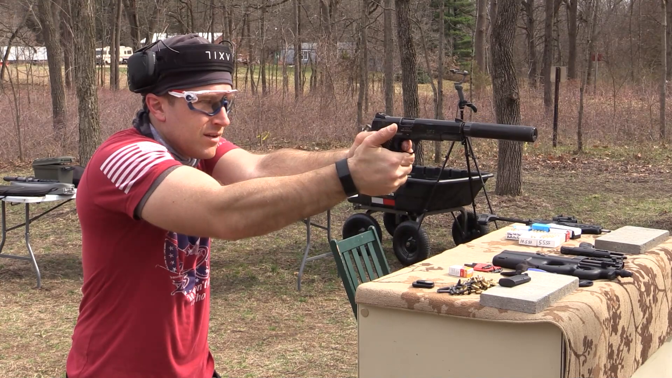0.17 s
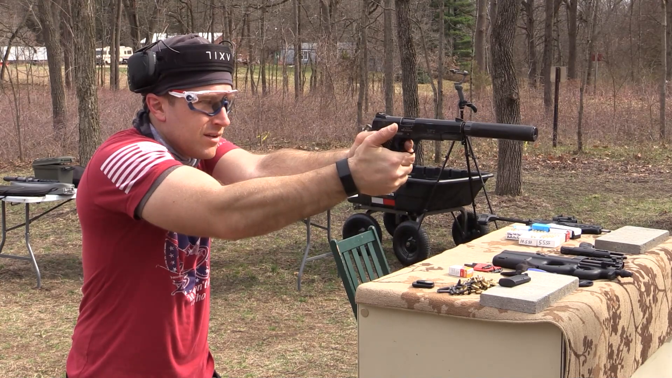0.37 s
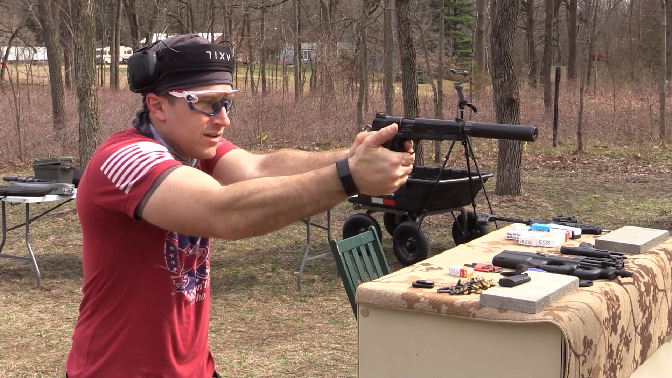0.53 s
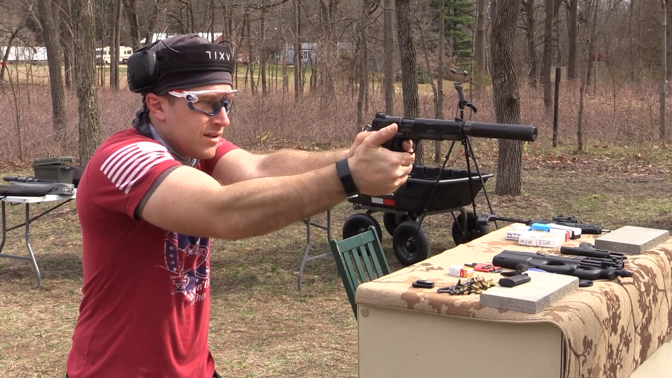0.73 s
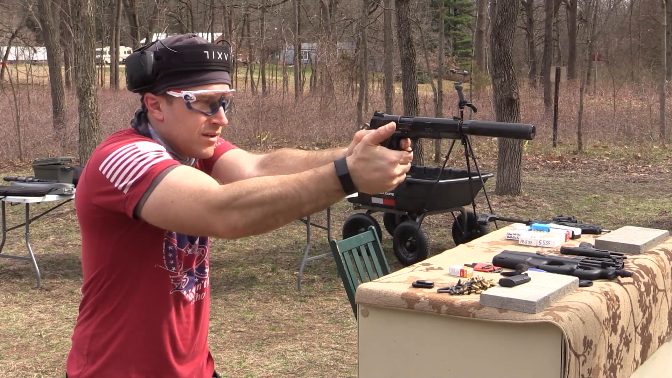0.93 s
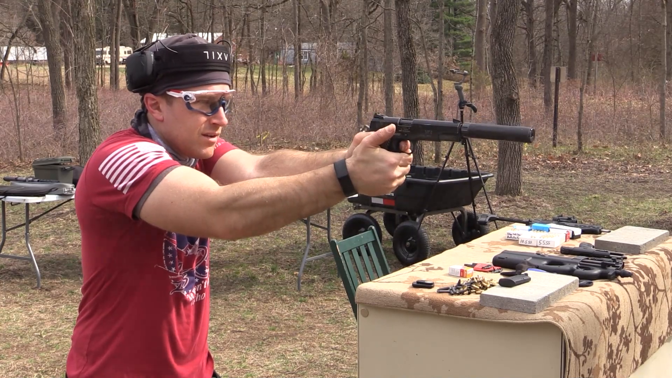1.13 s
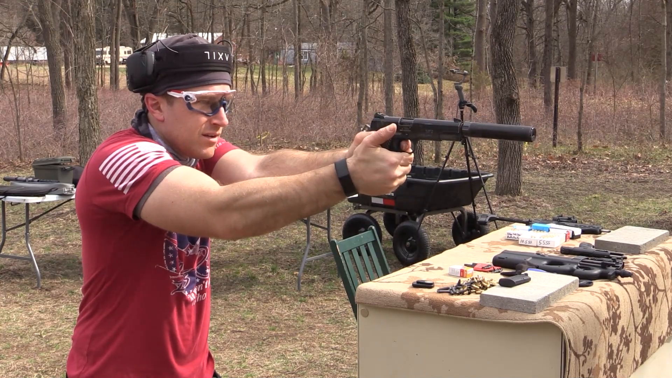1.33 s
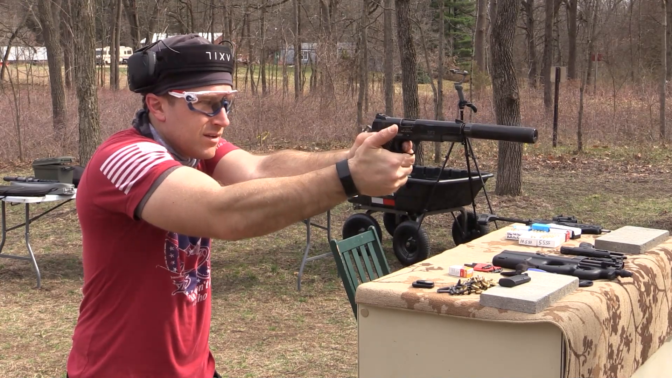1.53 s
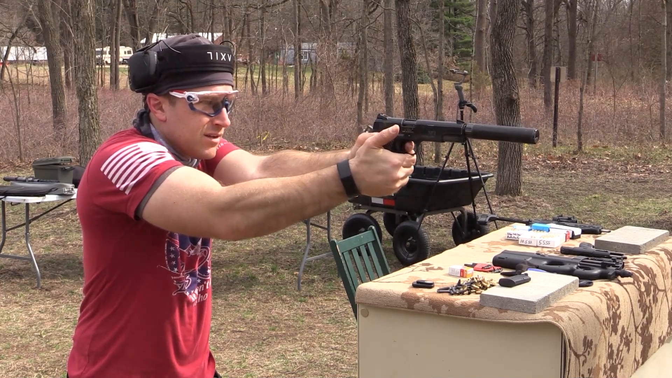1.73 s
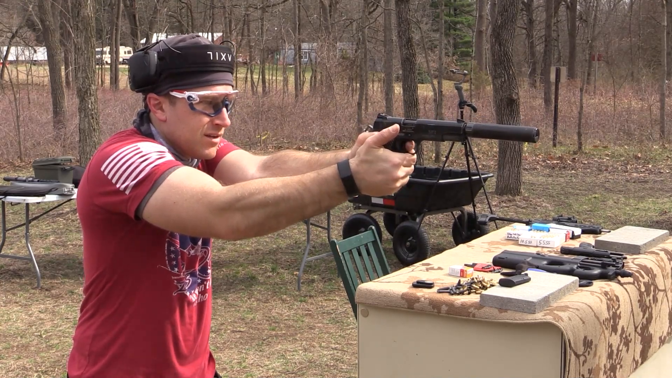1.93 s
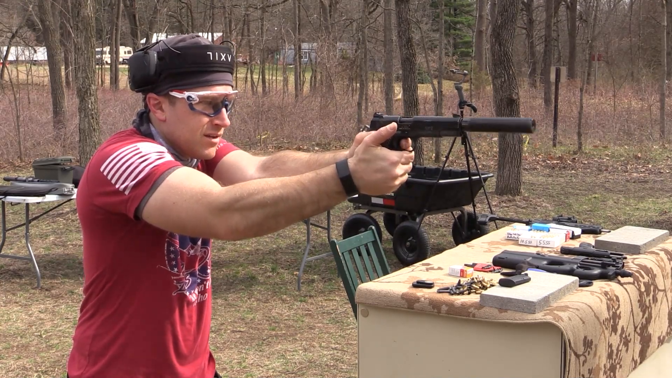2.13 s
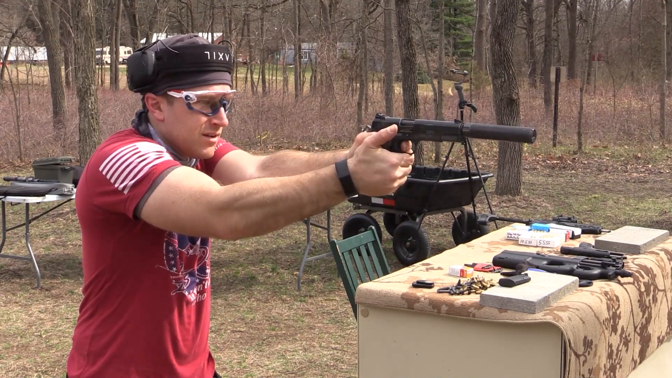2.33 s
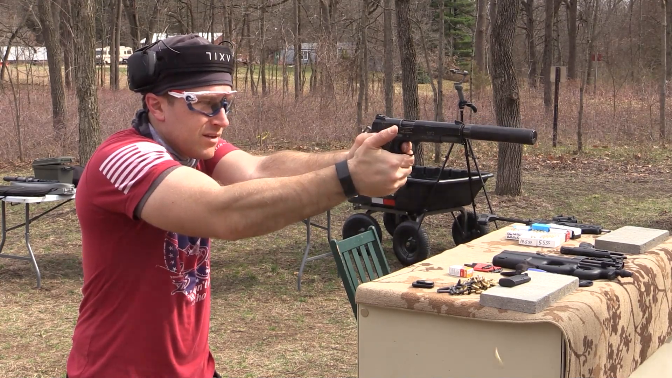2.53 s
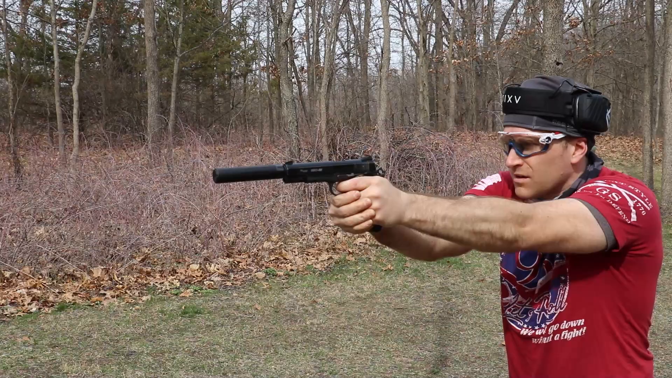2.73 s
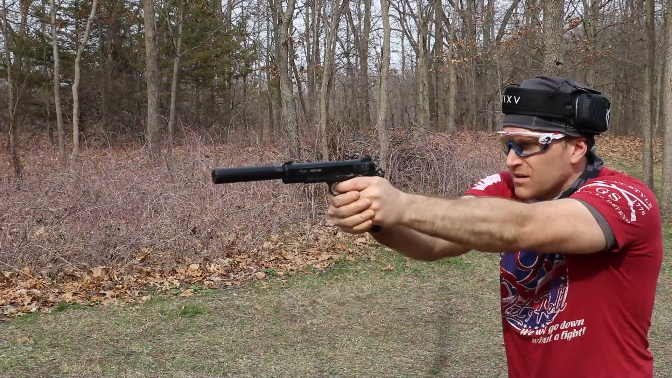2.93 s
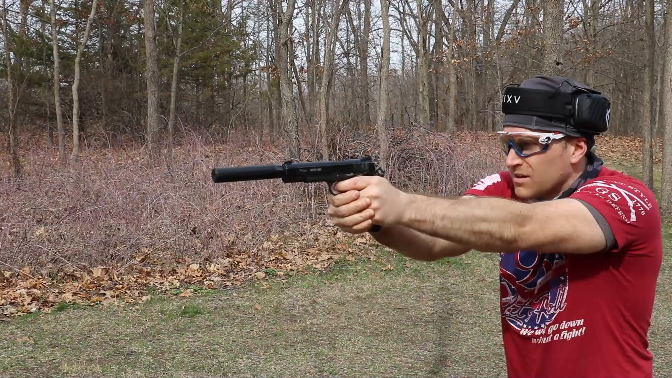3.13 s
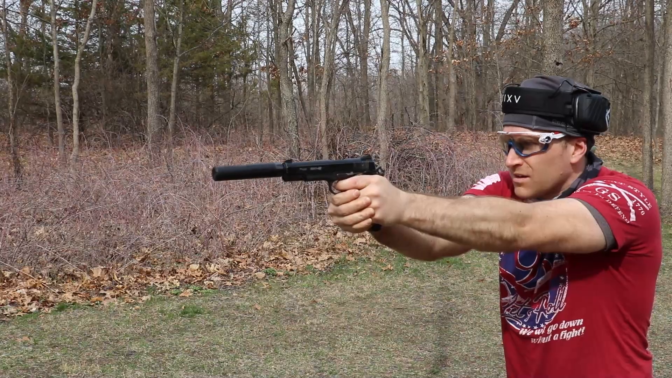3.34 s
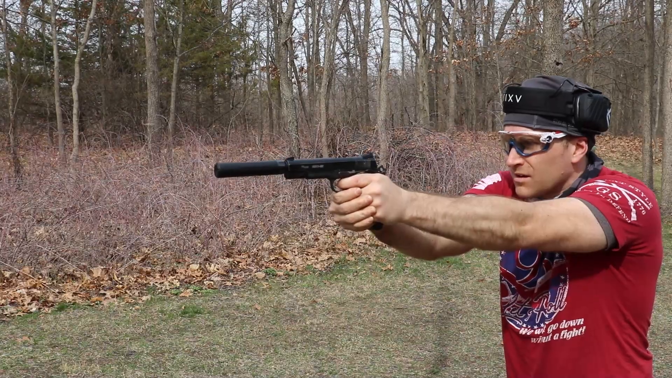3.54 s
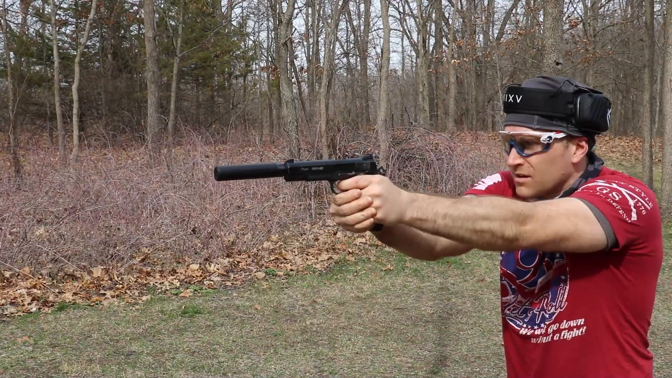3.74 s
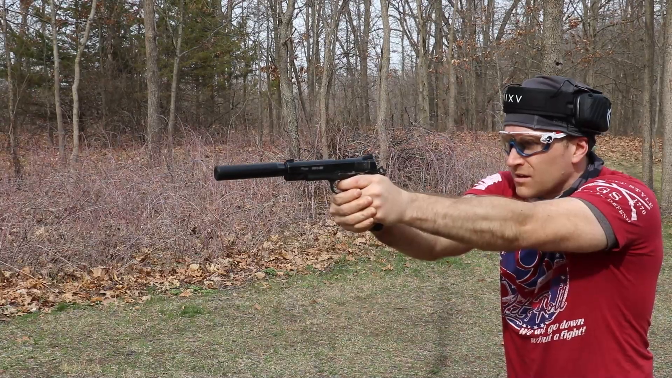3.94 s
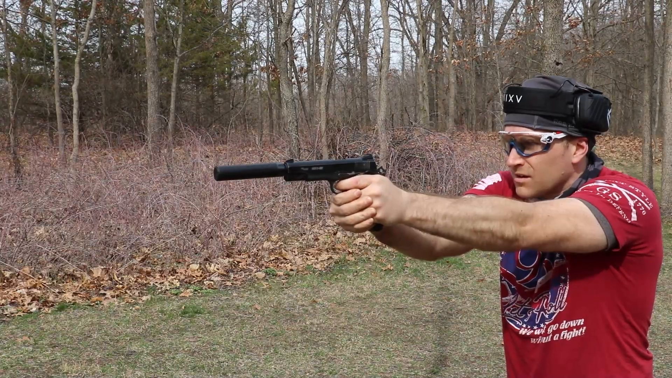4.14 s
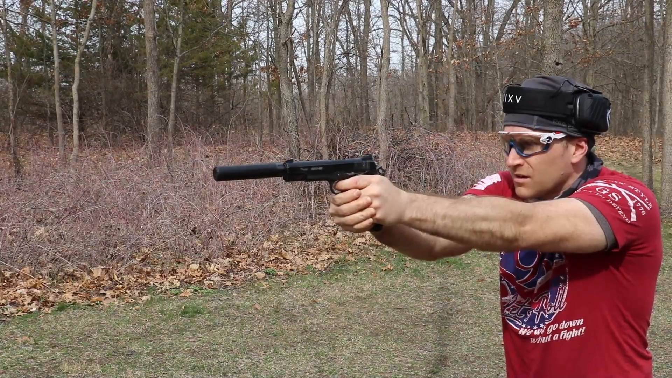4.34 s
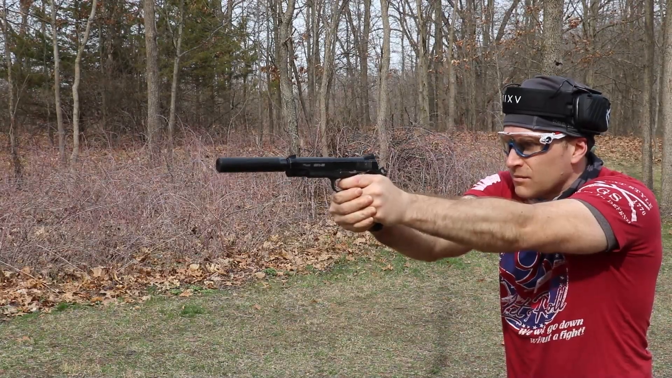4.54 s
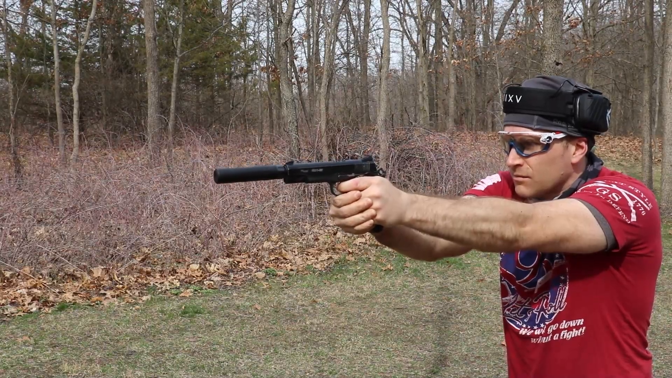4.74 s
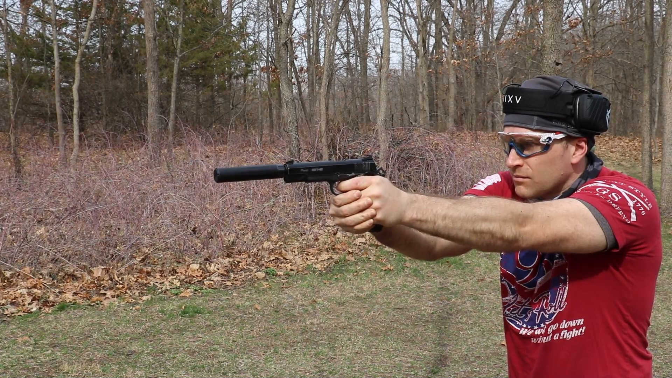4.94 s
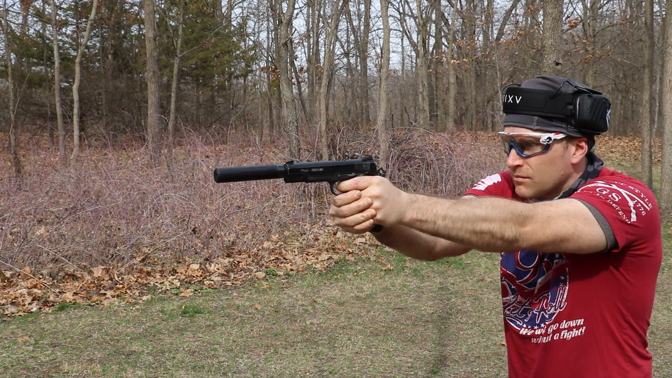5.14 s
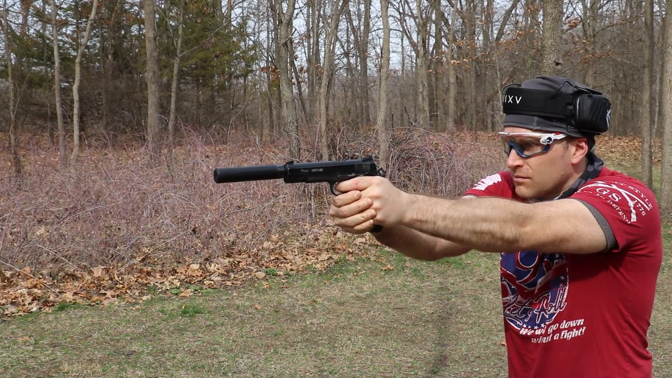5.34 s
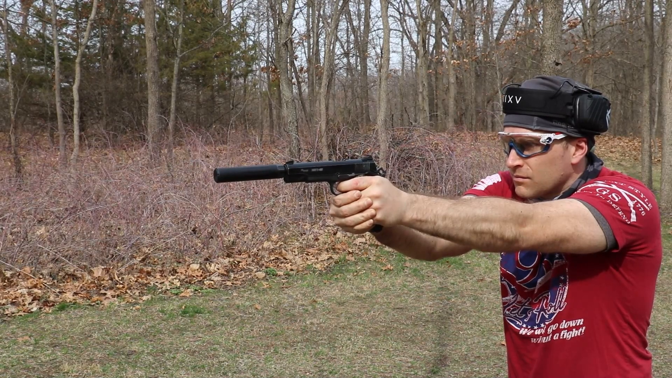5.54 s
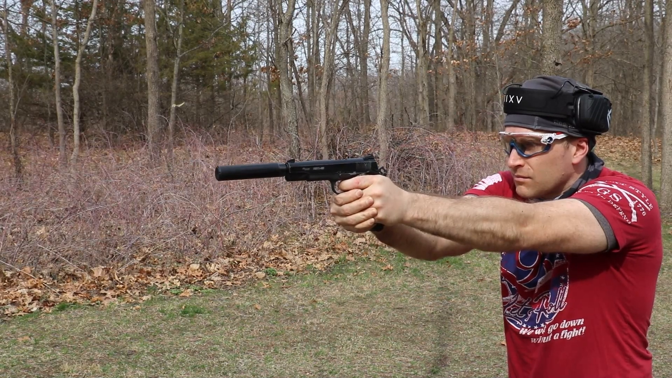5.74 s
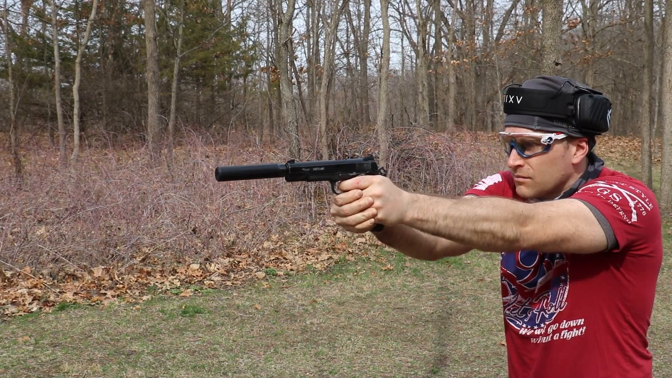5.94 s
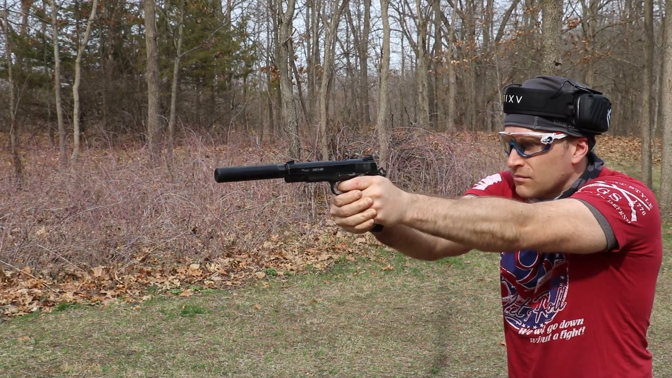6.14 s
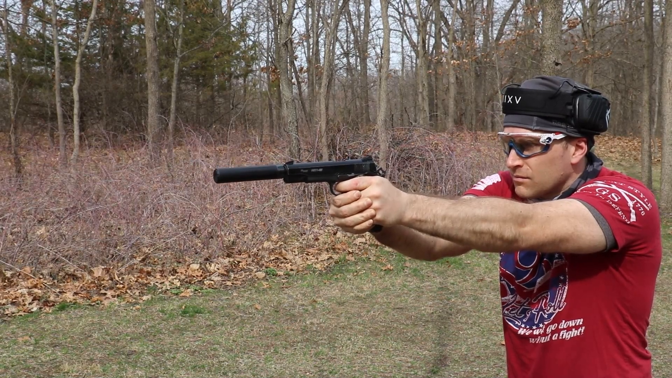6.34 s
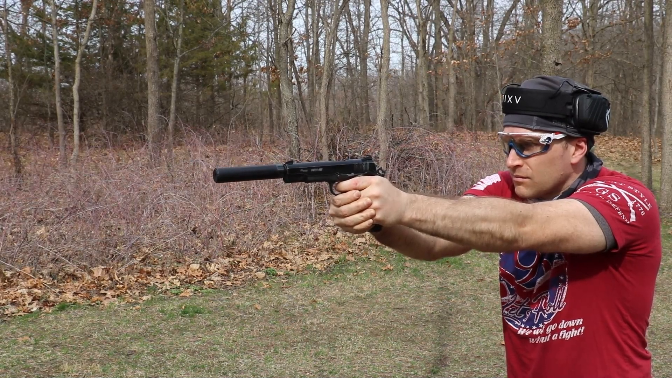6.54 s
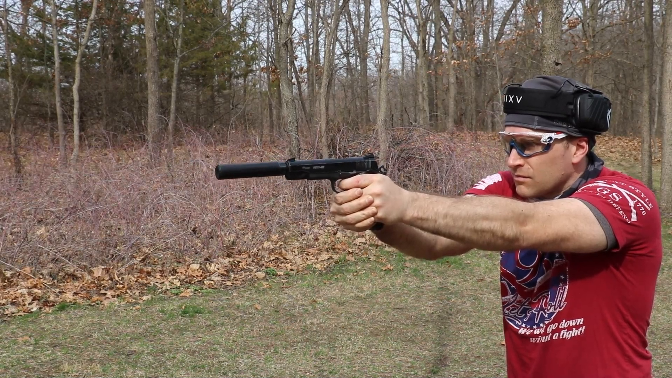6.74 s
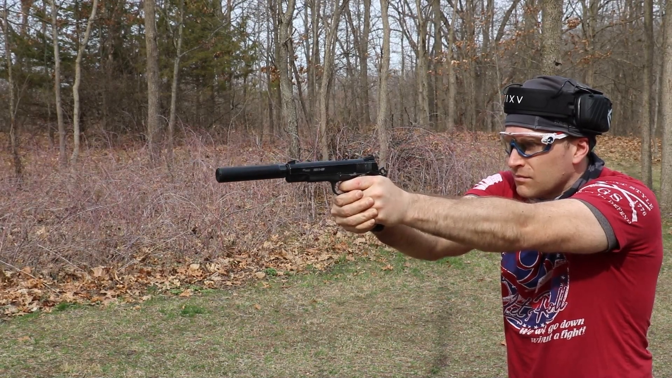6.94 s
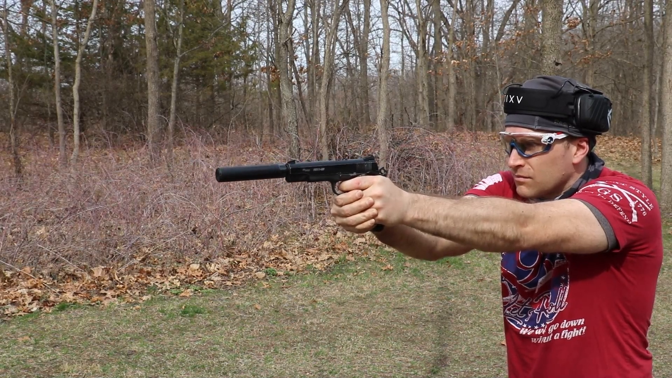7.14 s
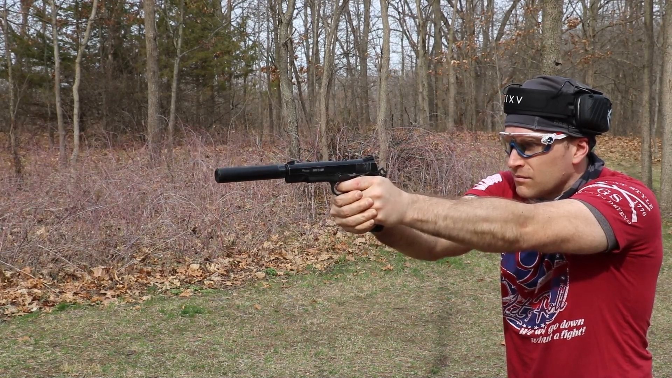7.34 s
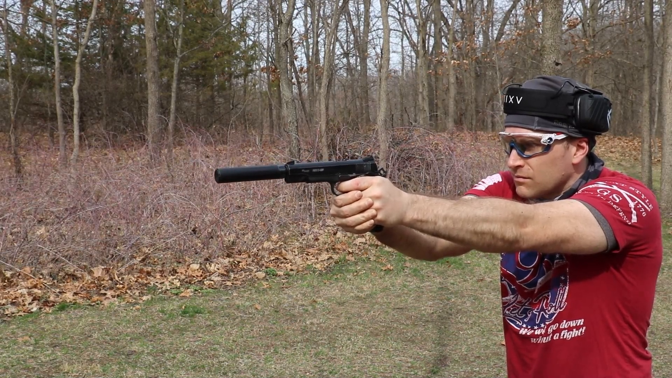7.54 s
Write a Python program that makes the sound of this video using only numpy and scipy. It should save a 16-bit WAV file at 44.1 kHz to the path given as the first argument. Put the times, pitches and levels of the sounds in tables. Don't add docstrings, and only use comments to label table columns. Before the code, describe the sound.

Close outdoor microphone in bare woods. Light low wind and two faint falling bird whistles, a small trigger click, then six suppressed small-calibre pistol shots about a second apart. Each is a short gassy pop, instantly followed by the slide's metallic clack, a fainter bullet slap from the backstop and a brief airy echo off trees. Tiny clicks fall between shots.

```python
import sys
import numpy as np
from scipy import signal
from scipy.fft import rfft, irfft
from scipy.io import wavfile
from scipy.ndimage import uniform_filter1d

SR = 44100
rng = np.random.default_rng(int(sys.argv[2]) if len(sys.argv) > 2 else 0)


def makeup_ratio(level_db):
    decades = np.asarray(level_db, float) / 20
    return 10 ** decades


def master(y):
    cut = np.clip(np.atleast_2d(y).T, -1, 1)
    pcm = np.round(cut * 32767)
    wavfile.write(sys.argv[1], SR, pcm.astype(np.int16))


N = 334278

# start_s, pulse_db, tree_echo_db, can_whistle_hz, whistle_echo_db
SHOTS = [
    (.8550, -13, -39.5, 5446, -48.5),
    (2.1881, -10.5, -40, 5424, -47.5),
    (3.4412, -11, -41.5, 6550, -54),
    (4.5626, -10, -39, 6263, -48),
    (5.6256, -13, -41.5, 5800, -49),
    (6.652, -11.5, -41.5, 5395, -50.5),
]
# time_s, level_db
GUSTS = [(0.0, -50.5), (0.72, -53), (0.91, -59), (1.46, -62), (2.22, -55.5), (2.77, -62.5), (3.46, -56.5),
         (3.84, -65.5), (4.6, -57), (5.0, -63.5), (5.51, -58.5), (5.85, -62), (6.76, -57), (7.58, -64.5)]


def evened(x):
    return x / np.sqrt(np.mean(x ** 2) + 1e-20)


def read(points, hz):
    f, value = np.transpose(points)
    return np.interp(np.log(hz + 1), np.log(f + 1), value)


def add(mix, start_s, sound):
    part = mix[round(start_s * SR):][:len(sound)]
    part += sound[:len(part)]


def clock(length_s):
    return np.arange(round(length_s * SR)) / SR


def coloured(spectrum, size):
    hz = np.fft.rfftfreq(size, 1 / SR)
    bins = rfft(rng.standard_normal(size)) * makeup_ratio(read(spectrum, hz))
    return evened(irfft(bins, size))


def dying(spectrum, decays, size):
    hz, t, z = signal.stft(coloured(spectrum, size), SR, nperseg=128)
    fade = makeup_ratio(-60 * t / read(decays, hz)[:, None])
    return signal.istft(z * fade, SR, nperseg=128)[1][:size]


def ring(modes, t, spread_db, scatter):
    hz, db, t60 = np.transpose(modes)[:, :, None]
    strength, detune, phase = rng.standard_normal((3, len(modes), 1))
    turns = hz * (1 + .015 * detune) * t + scatter * phase
    decay = makeup_ratio(db + spread_db * strength - 60 * t / t60)
    return (decay * np.sin(2 * np.pi * turns)).sum(0)


def wash(spectrum, level_db, patchy_db, lumpy_db):
    frames, hz = N // 256 + 5, np.fft.rfftfreq(1024, 1 / SR)
    real, imaginary, patches = rng.standard_normal((frames, 513, 3)).T
    lumps = evened(uniform_filter1d(patches[0], size=8))
    patches = uniform_filter1d(patches, size=10, axis=0)
    patches = evened(uniform_filter1d(patches, size=12, axis=1))
    gain = makeup_ratio(read(spectrum, hz)[:, None] + patchy_db * patches + lumpy_db * lumps)
    z = (real + 1j * imaginary) * gain
    return evened(signal.istft(z, nperseg=1024, noverlap=768)[1][:N]) * makeup_ratio(level_db)


def far_hiss(t, gust_db):
    # pitch_hz, density_db
    air = [(35, -32.5), (60, 0.5), (143, -2.5), (194, -4), (228, -6), (282, -7.5), (494, -12.5),
           (582, -14.5), (867, -17), (3220, -32.5), (11100, -46), (13800, -44), (15100, -45),
           (16200, -54.5)]
    lift_db = sum(2.43 * (t > s) * np.exp(-abs(t - s) / 0.49) for s, *_ in SHOTS)
    level_db = -51.5 + lift_db + 0.1 * (gust_db - gust_db.mean())
    return wash(air, level_db, patchy_db=.8, lumpy_db=.3)


def wind(gust_db):
    # pitch_hz, density_db
    eddies = [(8.2, -30.5), (14, 0), (33, 1.5), (65, -9.5), (107, -10.5), (150, -18), (200, -47),
              (330, -120)]
    return makeup_ratio(2.5) * wash(eddies, gust_db, patchy_db=1.5, lumpy_db=2.5)


def buffet(peak_db, length_ms):
    share = clock(length_ms / 1000) * 1000 / length_ms
    return makeup_ratio(peak_db) * np.sin(2 * np.pi * share) * np.sin(np.pi * share)


def bird(length_s, break_s, loudest_s, level_db):
    t = clock(length_s)
    rest_hz, top_hz, glide_s = 2130, 5350, .084
    hz = rest_hz + (top_hz - rest_hz) * np.exp(-t / glide_s)
    swell_db_per_s, fade_db_per_s = 85, 28
    level_db = level_db - np.maximum(swell_db_per_s * (loudest_s - t), fade_db_per_s * (t - loudest_s))
    level_db = level_db - 12 * np.exp(-((t - break_s) / .012) ** 2)
    flutter_db = 2.5 * evened(uniform_filter1d(rng.standard_normal(len(t)), size=300))
    tone = np.sqrt(2) * np.sin(2 * np.pi * np.cumsum(hz) / SR)
    return tone * makeup_ratio(level_db + flutter_db) * signal.windows.tukey(len(t), .1)


def rustle(level_db, length_ms, tilt_db):
    ms = 1000 * clock(0.22)
    shape = np.clip(ms / (0.12 * length_ms), 0, 1) * np.exp(-ms / length_ms)
    colour = [(100, -30 - 4 * tilt_db), (200, -3 * tilt_db), (15000, 3 * tilt_db), (16500, -30)]
    return makeup_ratio(level_db) * shape * coloured(colour, size=len(ms))


def lean(rows, body_db):
    return [(hz, db + body_db * (hz < 3500), *rest) for hz, db, *rest in rows]


def tap(modes, peak_db, body_db, burst_ms, ring_db, scatter):
    # pitch_hz, density_db
    contact_colour = [(500, -29.5), (900, -4), (3000, -0.5), (5000, -2.5), (8000, 1.5), (13000, -3),
                      (15500, -12), (16800, -35)]
    t = clock(0.033)
    rise = np.clip(t * 1000 / .25, 0, 1)
    contact = coloured(lean(contact_colour, body_db), size=len(t)) * np.exp(-t * 1000 / burst_ms)
    sound = rise * (contact + makeup_ratio(ring_db) * ring(lean(modes, body_db), t, 2.9, scatter))
    return makeup_ratio(peak_db) * sound / np.sqrt(uniform_filter1d(sound ** 2, size=30).max())


def trigger_click(peak_db, body_db):
    # pitch_hz, level_db, t60_s
    linkage = [(2250, -14, .009), (3100, -14, .007), (4100, -13, .006), (6500, -7, .006), (8900, -6, .004),
               (11500, -2, .0035), (12500, -4, .004), (14200, -10, .004), (16000, -10, .003)]
    return tap(linkage, peak_db - 7, body_db, burst_ms=.6, ring_db=6, scatter=.05)


def slap(crack_db, thud_db, body_db, echo_db):
    # pitch_hz, level_db
    crack_colour = [(710, -5), (1200, -6), (2620, 2), (3740, -22), (5710, -12), (6950, -5.5), (9610, -11.5),
                    (13000, -22), (16000, -31)]
    # pitch_hz, density_db
    berm = [(900, -25), (1700, -4), (2600, 0), (4000, -8), (7000, -10), (10000, -30)]
    ms = 1000 * clock(0.13)
    shape = np.clip(ms / .2, 0, 1) * np.exp(-ms / 1.2)
    second = np.clip((ms - 8.5) / .5, 0, 1) * np.exp(-abs(ms - 9) / 2.6)
    shape = shape + makeup_ratio(-12.5) * second
    crack = shape * coloured(lean(crack_colour, body_db), size=len(ms))
    thud = np.cos(2 * np.pi * 190 * ms / 1000) * np.exp(-ms / 3.8) * np.clip(ms / 0.66, 0, 1)
    echo_shape = np.clip((ms - 40) / 12, 0, 1) * np.exp(-abs(ms - 52) / 30)
    echo = echo_shape * coloured(berm, size=len(ms))
    return makeup_ratio(crack_db) * (crack + makeup_ratio(thud_db) * thud + makeup_ratio(echo_db) * echo)


def recoil(start_s, rattle_db):
    # delay_ms, peak_db, body_db
    stop = [(0, -8.5, -2), (3.4, -7.5, -7)]
    # delay_ms, level_db (relative to rattle_db), body_db
    rattle = [(9.2, -2, -3), (17.5, -8.5, -2)]
    blows = [(start_s + ms / 1000, db, body_db) for ms, db, body_db in stop]
    return blows + [(start_s + ms / 1000, rattle_db + db, body_db) for ms, db, body_db in rattle]


def slam(start_s, body_db, bounce_db):
    # delay_ms, peak_db, body_db
    settle = [(6.4, -23, -1.5), (10.1, -27, -2), (16.5, -35.5, -4.5)]
    blows = [(start_s, -7, body_db), (start_s + .004, bounce_db, -3.5)]
    return blows + [(start_s + ms / 1000, db, low_db) for ms, db, low_db in settle]


def slide_blow(peak_db, body_db):
    # pitch_hz, level_db, t60_s
    steel = [(1250, 6, .006), (2300, 0, .013), (3030, -4, .012), (4600, -2, .01), (6100, -3, .012),
             (7950, -1, .02), (8350, -3, .022), (10100, -2, .012), (11800, -3, .012), (13600, -5, .01)]
    return tap(steel, peak_db, body_db, burst_ms=1.2, ring_db=-8.5, scatter=0.99)


def muzzle(pulse_db, trees_db, whistle_hz, sung_db):
    # pitch_hz, density_db
    jet_colour = [(590, -36), (1000, -3.5), (1530, -2), (3400, -7), (7230, -2), (8030, -9.5), (8520, -2),
                  (12900, -1), (15700, -20), (16700, -38)]
    # offset_hz from its centre, level_db
    line = [(-1050, -30), (-220, -3.5), (0, 0), (220, -3.5), (1050, -30)]
    # delay_ms, size
    returns = [(1.8, -1.3), (4.7, -.45), (8.1, -0.4), (10.9, -1.2)]
    # pitch_hz, level_db, t60_s
    can = [(146.6, -3, 0.063), (338, -14.5, .04), (655, -15, 0.067)]
    # pitch_hz, t60_s
    near_decay = [(200, 0.11), (1000, 0.17), (4000, 0.23), (12000, 0.15)]
    # pitch_hz, t60_s
    tree_decay = [(300, 0.25), (1300, 0.9), (3500, 1), (6000, 0.65), (8000, .62), (10500, 0.52),
                  (15000, 0.24)]
    # pitch_hz, density_db
    tree_colour = [(240, -29.5), (400, -4), (1000, -5), (1800, -3), (3900, -9.5), (6000, -3.5), (8500, -3),
                   (12000, -6), (15500, -13.5), (16500, -36)]
    t = clock(1.6)
    ms, size = 1000 * t, len(t)
    hammer = makeup_ratio(-12) * np.clip(ms / .4, 0, 1) * np.exp(-ms / 1.5)
    jet_end_ms = 8.8
    flow_stop = 1 + np.exp(np.minimum((ms - jet_end_ms + 1.2) / .6, 50))
    flow = np.clip((ms - 1.5) / .4, 0, 1) / flow_stop
    leak = makeup_ratio(-12) * np.clip(ms / 3, 0, 1) * np.exp(-ms / 7)
    jet = makeup_ratio(-1) * (hammer + flow + leak) * coloured(jet_colour, size)
    whistle = coloured([(whistle_hz + hz, db) for hz, db in line], size)
    sing = whistle * (makeup_ratio(-8) * np.exp(-((ms - 6.3) / 2.1) ** 2) + makeup_ratio(sung_db - 60 * t / 0.8))
    jitter = 1 + .2 * rng.standard_normal(len(returns))
    pulses = sum(height * j * np.exp(-((ms - at) / 0.31) ** 2) for (at, height), j in zip(returns, jitter))
    pulses = pulses - uniform_filter1d(pulses, size=500)
    boom = -np.clip(ms / 2.2, 0, 1) * ring(can, t, spread_db=.7, scatter=.012)
    near = makeup_ratio(-21.5) * dying(jet_colour, near_decay, size) * np.clip(ms / 8, 0, 1)
    trees = makeup_ratio(trees_db) * dying(tree_colour, tree_decay, size) * np.clip(ms / 40, 0, 1)
    treeline = 1 + 0.61 * np.clip((ms - 180) / 15, 0, 1)
    return jet + sing + makeup_ratio(pulse_db) * (pulses + boom) + near + trees * treeline


def scene():
    # start_s, peak_db, length_ms
    buffets = [(0, -37.5, 39), (.125, -43, 40), (.255, -45, 30), (.325, -47, 30), (.55, -45, 40),
               (.7, -44, 40), (3.439, -23.5, 19), (5.624, -29, 19), (3.475, -37.5, 40), (4.2, -44.5, 45)]
    # start_s, length_s, break_s and loudest_s after the start, level_db
    notes_sung = [
        (.168, .204, .068, .115, -69),
        (.613, .187, .04, .075, -70),
    ]
    # start_s, level_db, length_ms, tilt_db per octave
    rustles = [(.308, -54, 4, -4), (1.573, -58, 2, -2), (1.995, -60, 3, -.6), (4.501, -61, 14, 2),
               (4.523, -64, 3, 2), (4.505, -43, 35, -12), (5.277, -66, 4, 2), (6.352, -61, 3, -1.2),
               (6.3925, -50, 1.1, -2.8)]
    # start_s, peak_db, body_db
    clicks = [(0.3546, -28, 2.5), (1.71, -38, 10), (2.9908, -28.5, 0), (4.166, -29, 0.5),
              (5.3266, -30, 0.5), (6.3094, -28.5, 0), (7.3727, -27, -1.5)]
    # start_s, crack_db, then thud_db, body_db, echo_db relative to it
    slaps = [(1.0037, -29.5, 4.5, -8.5, -28), (2.3347, -24, -4, 3, -27), (3.5889, -30, -0.5, -13, -38),
             (4.7119, -27, -2, -5, -23), (5.7742, -34.5, -8, -10, -33), (6.801, -34.5, 2, -4, -30)]
    # start_s, rattle_db
    rear = [(0.8673, -30.5), (2.2, -18.5), (3.4525, -18.5), (4.5735, -14), (5.6369, -23.5), (6.6626, -16.5)]
    # start_s, body_db, bounce_db
    slams = [(0.8962, -1, -12), (2.2279, 0.5, -15.5), (3.4796, 2, -11.5), (4.6018, 1.5, -17),
             (5.6647, 1, -12.5), (6.6908, -0.5, -14)]
    t = np.arange(N) / SR
    gust_db = np.interp(t, *np.transpose(GUSTS))
    mix = far_hiss(t, gust_db) + wind(gust_db)
    sources = [(buffets, buffet), (notes_sung, bird), (rustles, rustle), (clicks, trigger_click),
               (slaps, slap), (SHOTS, muzzle)]
    for events, source in sources:
        for start_s, *settings in events:
            add(mix, start_s, source(*settings))
    for back, shut in zip(rear, slams):
        for start_s, peak_db, body_db in recoil(*back) + slam(*shut):
            add(mix, start_s, slide_blow(peak_db, body_db))
    return mix[None]


def low_pass(x):
    return signal.sosfilt(signal.butter(12, 16820, fs=SR, output="sos"), x)


def record(dry):
    ceiling = .6
    hot = dry / (1 + abs(dry / ceiling) ** 6) ** (1 / 6)
    lowpass = signal.firwin(75, 15800, window=("kaiser", 6), fs=SR)
    band = signal.oaconvolve(hot, lowpass[None], "same")
    return low_pass(band)


dry = scene()
out = record(dry)
master(out)
```